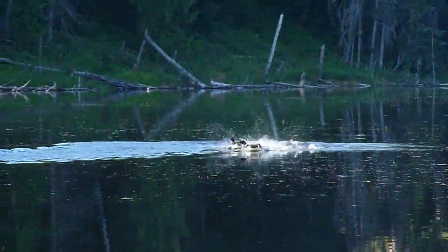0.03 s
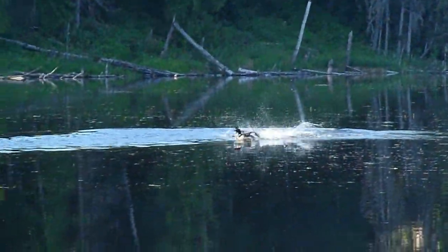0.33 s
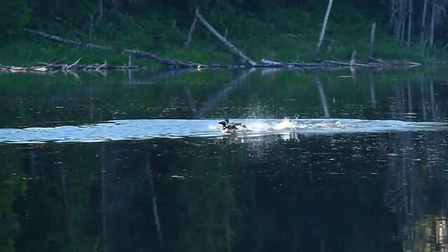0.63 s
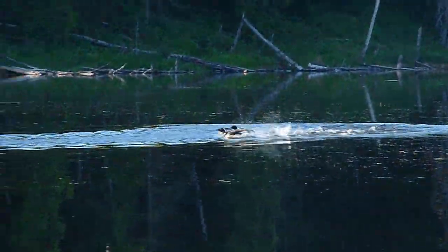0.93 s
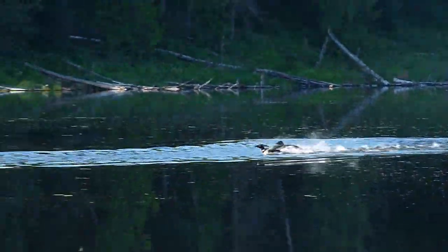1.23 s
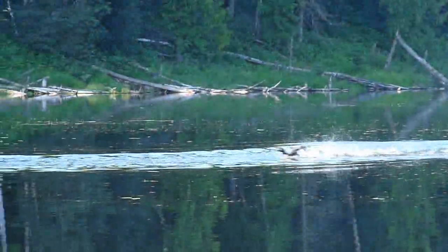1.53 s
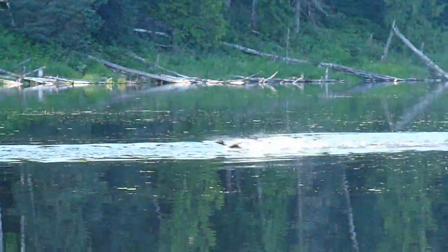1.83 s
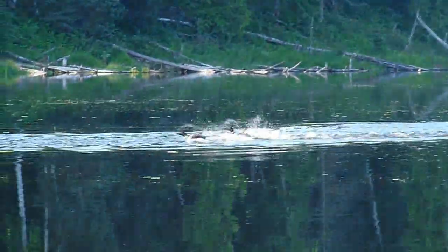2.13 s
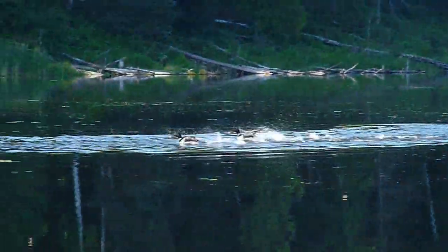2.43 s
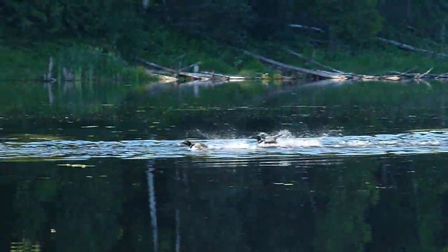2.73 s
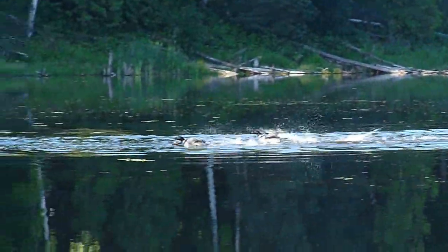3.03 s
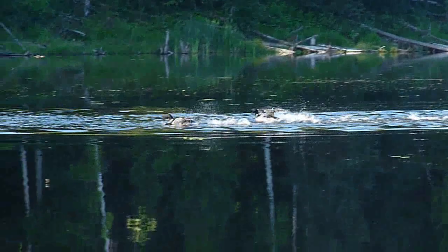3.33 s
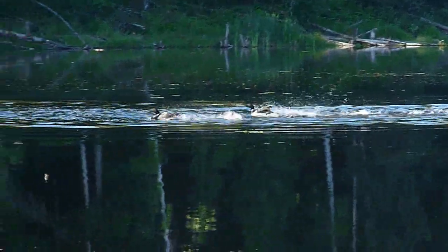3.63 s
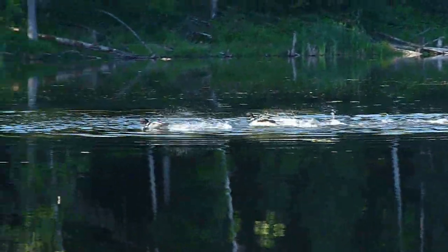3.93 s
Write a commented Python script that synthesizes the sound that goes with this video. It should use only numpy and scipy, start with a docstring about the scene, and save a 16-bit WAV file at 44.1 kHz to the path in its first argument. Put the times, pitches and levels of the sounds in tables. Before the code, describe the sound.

Dull splashing carries over a forest lake as two distant water birds chase each other, mixed with a low roar and a wavering hollow tone. Close by are a faint hum and a few soft microphone bumps, mostly later on.

```python
"""Two water birds chase each other across a far forest lake. From the start their splashing is a dull
wash that blends with a distant low roar, and a hollow tone swells and fades in it. Close by, a camera
hums and hisses; it takes one soft bump at about 0.7 s. Five more bumps come between 2.3 and 3.1 s.
Among them, near 2.5 s, the wash is at its loudest, and then it rises a little in pitch."""
import sys
import numpy as np
from scipy import signal
from scipy.fft import rfft, irfft
from scipy.io import wavfile
from scipy.ndimage import uniform_filter1d, map_coordinates

SR = 44100
rng = np.random.default_rng(int(sys.argv[2]) if len(sys.argv) > 2 else 0)


def unload_audio(sound):
    """Save the sound as a 16-bit wav file, at the path given as the first command line argument."""
    columns = np.transpose(np.atleast_2d(sound))
    # keep every value between -1 and 1, then stretch to whole-number steps
    steps = np.round(np.clip(columns, -1, 1) * 32767)
    wavfile.write(sys.argv[1], SR, steps.astype(np.int16))


N = 176400
TIME, FREQ = np.arange(N) / SR, np.fft.rfftfreq(N, 1 / SR)
TREBLE_LIMIT_HZ = 7330


# how deep or bright the churned water sounds (frequency [Hz], relative level [dB])
WASH_SPECTRUM = [(200, -18.5), (450, -6), (650, -6), (820, 4), (1050, -1.5), (1300, -5.5), (1700, -24),
                 (2400, -34.5), (4000, -54.5)]
# how its pitch moves, 1 meaning unchanged (time [s], pitch [ratio])
WASH_PITCH = [(0, 0.98), (.7, 1.007), (1.5, .98), (2.55, .97), (3.0, 1.1), (3.5, 1.06), (4, 1.04)]
# how loud it is (time [s], level [dB])
WASH_LEVEL = [(0, -42.5), (.5, -47), (.7, -42.5), (1.1, -48), (1.5, -47.5), (1.9, -45), (2.29, -46),
              (2.53, -39.5), (2.75, -40.5), (3.08, -43), (3.35, -42), (3.52, -42), (3.65, -48), (3.86, -43),
              (4, -47)]
# the brighter sound of the spray (frequency [Hz], relative level [dB])
SPRAY_SPECTRUM = [(700, -15.5), (1100, -2), (1450, 1.5), (1750, -2.5), (2100, -10), (2600, -19.5),
                  (3400, -29.5), (5000, -40.5)]
# how loud the spray is (time [s], level [dB])
SPRAY_LEVEL = [(0, -49.5), (.2, -49), (.7, -52), (1.2, -53), (1.9, -49.5), (2.3, -50), (2.5, -52),
               (2.85, -51), (3.15, -53.5), (3.4, -51.5), (3.7, -53.5), (4, -53)]

def splashing(drops_per_s=900, drop_share=0.34):
    """The birds churn the water into a dull wash and throw up spray, made partly of falling drops."""
    drops = (rng.random(N) < drops_per_s / SR) * rng.standard_normal(N)
    drops *= amp(-np.minimum(rng.exponential(1, N), 4))  # each drop is up to 4 dB softer
    spray = np.sqrt(drop_share) * unit(drops) + np.sqrt(1 - drop_share) * patchy_noise(patchy_db=0.4)
    wash = colour(patchy_noise(patchy_db=1.0), WASH_SPECTRUM)
    # running through the noise faster raises its pitch
    position = np.cumsum(np.interp(TIME, *np.transpose(WASH_PITCH)))
    wash = map_coordinates(wash, [position], order=3, mode="grid-wrap")
    return level(WASH_LEVEL) * wash + level(SPRAY_LEVEL) * colour(spray, SPRAY_SPECTRUM)


# swells of the hollow tone (peak time [s], rise [s], fall [s], level [dB], pitch [Hz])
TONE_SWELLS = [(.135, 0.021, 0.021, -46, 518), (.345, 0.016, 0.02, -40.5, 530),
               (.48, 0.039, 0.047, -45, 536), (.61, .025, 0.052, -43.5, 530), (.94, .03, 0.025, -47.5, 538),
               (1.43, .16, .14, -44, 527), (2.3, 0.11, 0.041, -41, 516.2), (2.73, 0.024, 0.054, -41, 531),
               (2.865, 0.029, 0.027, -43, 527.5), (2.99, 0.029, 0.032, -45, 525.4),
               (3.1, 0.032, 0.027, -44.5, 533), (3.17, .03, 0.063, -42.5, 520.3),
               (3.33, 0.06, 0.071, -45, 524), (3.5, 0.044, 0.038, -43.5, 521.5),
               (3.65, 0.035, 0.091, -46.5, 542), (3.88, 0.062, 0.13, -45, 527)]

def hollow_tone(blur_hz=20, noise_share=0.74, waver_hz=2.99, linger_db=-53, linger_hz=532):
    """A far tone, blurred by noise, wavers as it swells and lingers faintly in between."""
    lingering = (flutter(blur_hz) * np.exp(2j * np.pi * linger_hz * TIME)).real
    out = amp(linger_db) * unit(lingering)
    for peak, rise, fall, db, hz in TONE_SWELLS:
        swell = np.exp(-.5 * ((TIME - peak) / np.where(TIME < peak, rise, fall)) ** 2)
        blur = np.sqrt(1 - noise_share) + np.sqrt(noise_share / 2) * flutter(blur_hz)
        blur /= np.sqrt(np.average(abs(blur) ** 2, weights=swell ** 2))  # keeps the swell at its level
        cycles = np.cumsum(hz + waver_hz * drift(rate_hz=5.82)) / SR
        out += amp(db) * swell * np.sqrt(2) * (blur * np.exp(2j * np.pi * cycles)).real
    return out


# soft bumps on the camera (time [s], strength [dB])
BUMPS = [(.66, -34), (2.362, -36), (2.393, -33), (2.506, -27), (2.92, -38), (3.054, -32.5)]
# the notes its mount rings with (pitch [Hz], relative level [dB], time to fade by 60 dB [s])
MOUNT_NOTES = [(87.6, -6.5, 0.1), (129, -12, 0.053), (212, -13, 0.058), (466, -7, 0.068)]
# the dull scuff of a bump (frequency [Hz], relative level [dB])
SCUFF_SPECTRUM = [(150, -4), (500, 0), (850, -1.5), (1200, -16), (2500, -41)]

def camera_bumps(rise_s=0.0038, scuff_fade_s=0.049):
    """Each soft knock scuffs the camera and makes its mount ring briefly with low notes."""
    out = np.zeros(N)
    scuff = amp(-3.5) * colour(rng.standard_normal(N), SCUFF_SPECTRUM)
    for start, strength_db in BUMPS:
        age = np.maximum(TIME - start, 0)
        ring = sum(amp(db - 60 * age / fade_s) * np.sin(2 * np.pi * hz * age)
                   for hz, db, fade_s in MOUNT_NOTES)
        onset = np.minimum(age / rise_s, 1)
        out += amp(strength_db) * onset * (ring + scuff * amp(-60 * age / scuff_fade_s))
    return out


# the deep sound of the far surroundings (frequency [Hz], relative level [dB])
ROAR_SPECTRUM = [(20, -16), (40, -10), (65, -5), (90, -1), (120, 0.5), (150, -2.5), (200, -1), (260, -3),
                 (320, -2.5), (440, -6.5), (620, -2), (820, -4), (1100, -7), (1500, -16.5), (2000, -23.5),
                 (2800, -32.5), (4500, -47)]

def distant_roar(level_db=-44):
    """The far surroundings make a low, even noise."""
    return amp(level_db) * colour(rng.standard_normal(N), ROAR_SPECTRUM)


# how loud the camera's low hum is (time [s], level [dB])
HUM_LEVEL = [(0, -68), (.38, -56), (.55, -50.5), (.72, -64), (.95, -59), (1.08, -49.5), (1.25, -55.5),
             (1.4, -66.5), (1.65, -61), (1.77, -47.5), (1.97, -54), (2.2, -52), (2.55, -57), (3.1, -56.5),
             (3.33, -53), (4, -59)]
# the thin, steady tones of its whine (pitch [Hz], level [dB])
WHINE_TONES = [(318, -63), (392, -62), (3558, -94), (4295, -95), (6223, -92), (6666, -86.5)]

def camera_noise(hum_hz=172.3, hiss_db=-69, whine_waver_db=1.5):
    """The camera gives off an even hiss, a thin whine and a low hum that comes and goes."""
    boost = np.sqrt(SR / 2 / TREBLE_LIMIT_HZ)  # makes up for the hiss lost above the treble limit
    hiss = amp(hiss_db) * boost * rng.standard_normal(N)
    whine = sum(amp(db + whine_waver_db * drift(rate_hz=3.0)) * wavering(hz) for hz, db in WHINE_TONES)
    hum = level(HUM_LEVEL) * wavering(hum_hz)
    return hiss + whine + hum


def amp(db):
    """Turns decibels into a number to multiply a sound by."""
    return 10 ** (np.asarray(db) / 20)


def unit(x):
    """Scales a sound to an average strength (rms) of 1."""
    return x / np.sqrt(np.mean(abs(x) ** 2) + 1e-20)


def level(points):
    """Joins (time [s], level [dB]) points into a volume curve."""
    return amp(np.interp(TIME, *np.transpose(points)))


def colour(x, points):
    """Shapes lows and highs by (frequency [Hz], level [dB]) points; the result has strength 1."""
    hz, db = np.transpose(points)
    gain = amp(np.interp(np.log(FREQ + 1), np.log(hz), db))
    return unit(irfft(rfft(x) * gain, N))


def drift(rate_hz):
    """A smooth random wobble of strength 1."""
    return unit(irfft(rfft(rng.standard_normal(N)) * np.exp(-.5 * (FREQ / rate_hz) ** 2), N))


def flutter(rate_hz):
    """A pair of wobbles that blurs both the loudness and the pitch of a tone."""
    return drift(rate_hz) + 1j * drift(rate_hz)


def wavering(hz, waver_hz=2.2):
    """A tone of strength 1 whose pitch trembles slightly."""
    cycles = np.cumsum(hz + waver_hz * drift(rate_hz=8.75)) / SR
    return unit(np.sin(2 * np.pi * cycles))


def patchy_noise(patchy_db):
    """A hiss whose level wanders in small patches of time and pitch."""
    grid = signal.stft(rng.standard_normal(N), nperseg=1024, noverlap=768)[2]
    patches = uniform_filter1d(rng.standard_normal(grid.shape), 14, axis=1)  # smooth over time
    patches = unit(uniform_filter1d(patches, 7, axis=0))  # and over pitch
    return unit(signal.istft(grid * amp(patchy_db * patches), nperseg=1024, noverlap=768)[1][:N])


def scene():
    """Adds up all the sounds at one microphone."""
    return (splashing() + hollow_tone() + camera_bumps() + distant_roar() + camera_noise())[None]


def record(dry):
    """Cuts away the sound above the treble limit."""
    treble_cut = signal.firwin(1501, TREBLE_LIMIT_HZ, window=("kaiser", 9), fs=SR)
    return signal.oaconvolve(dry, treble_cut[None], "same")


dry = scene()
out = record(dry)
unload_audio(out)
```